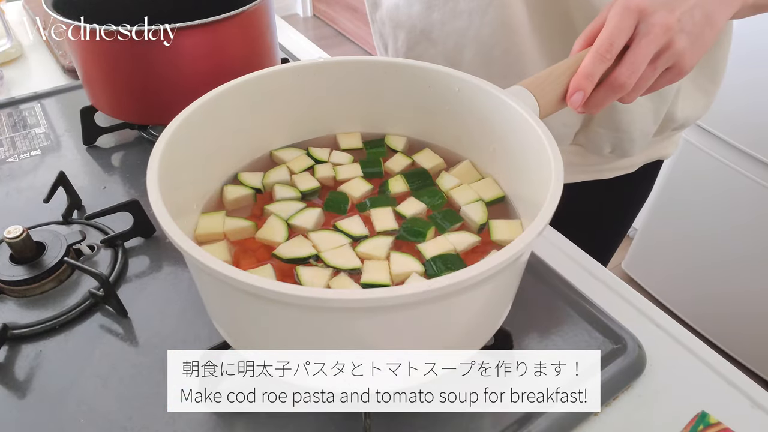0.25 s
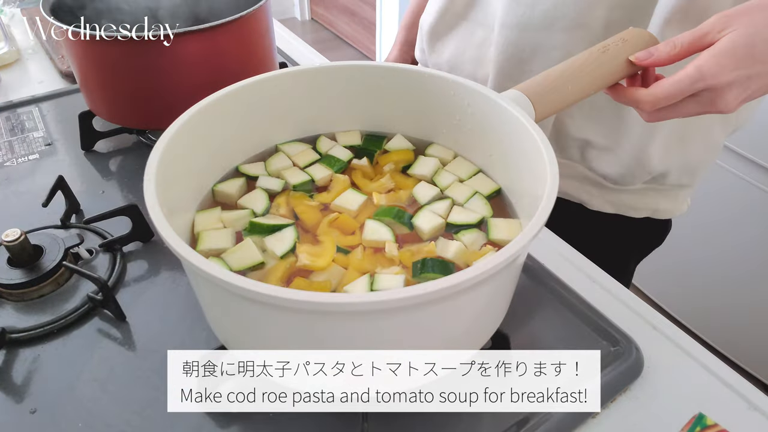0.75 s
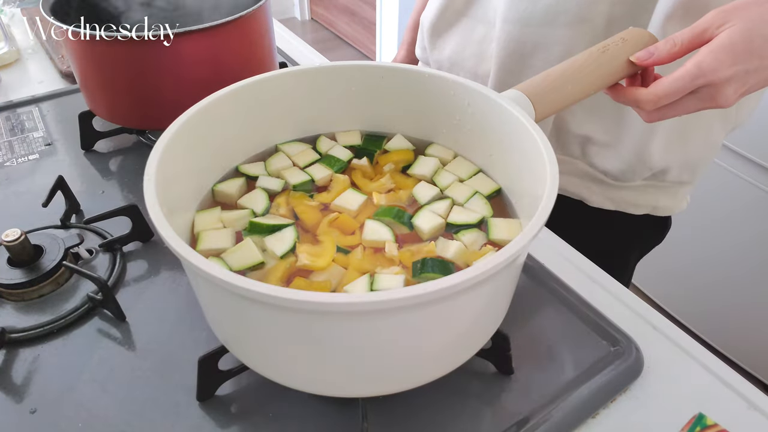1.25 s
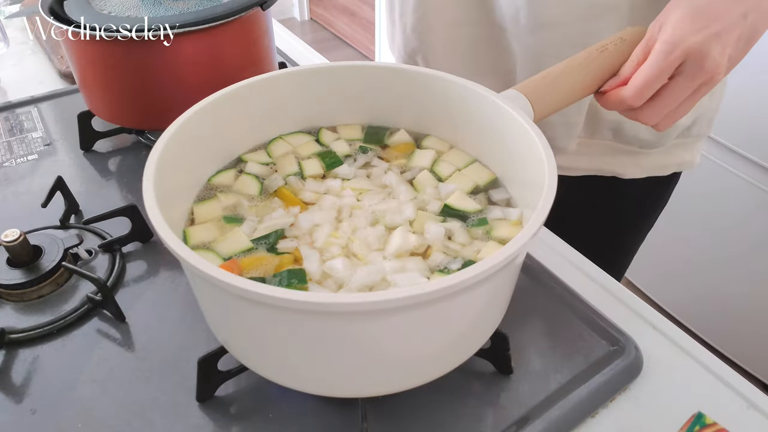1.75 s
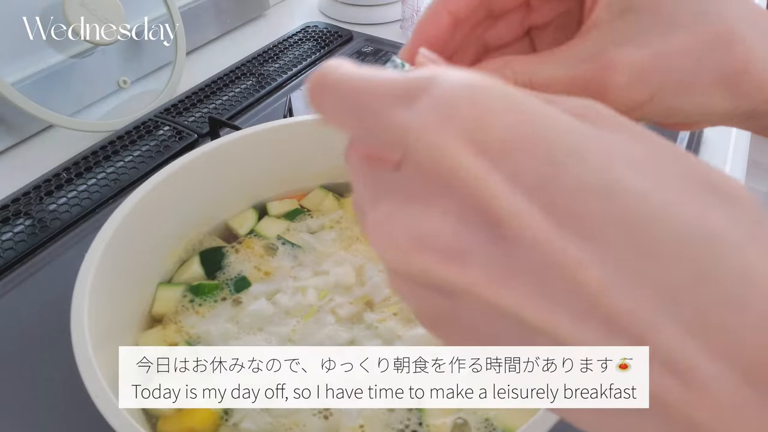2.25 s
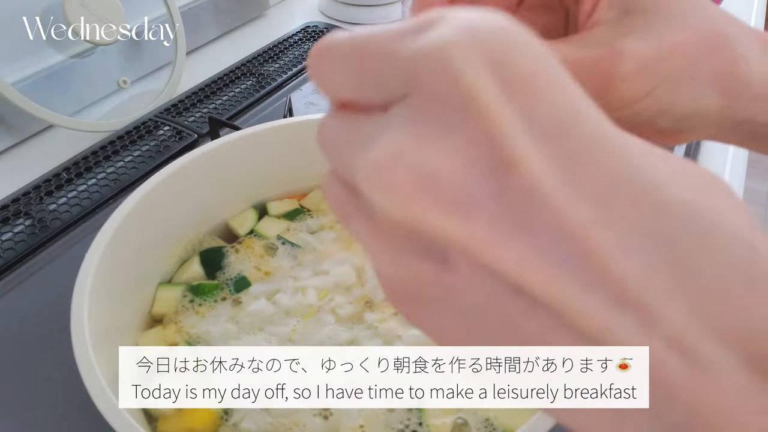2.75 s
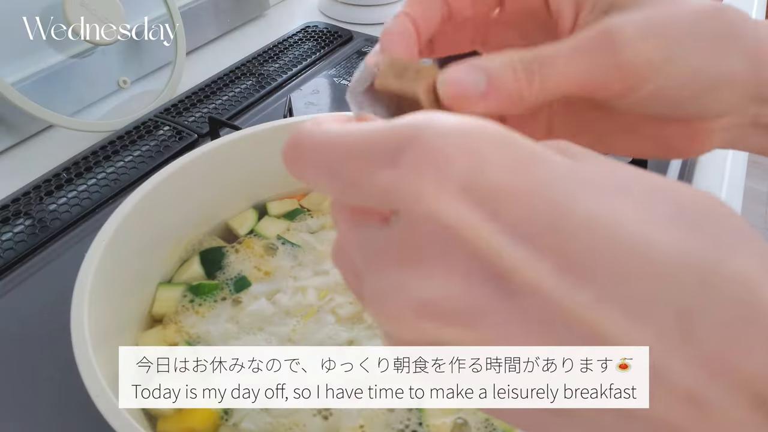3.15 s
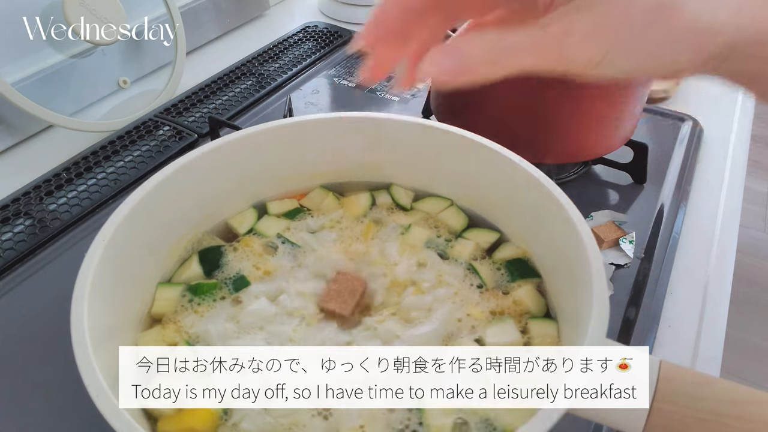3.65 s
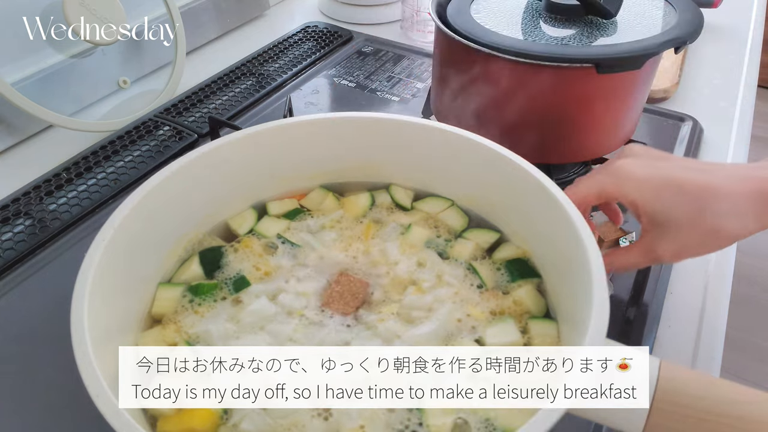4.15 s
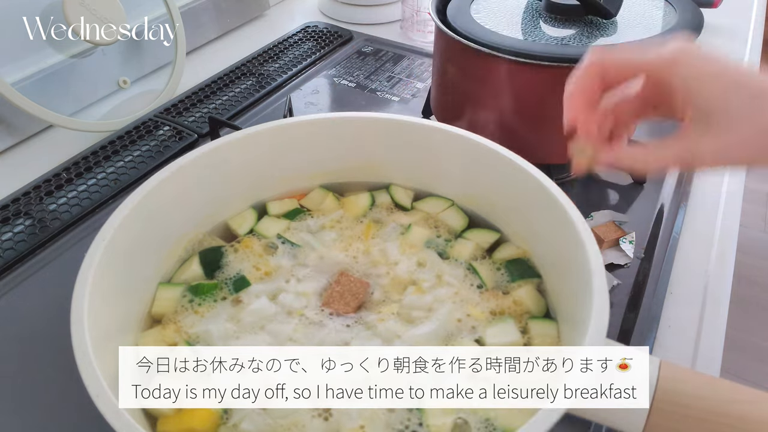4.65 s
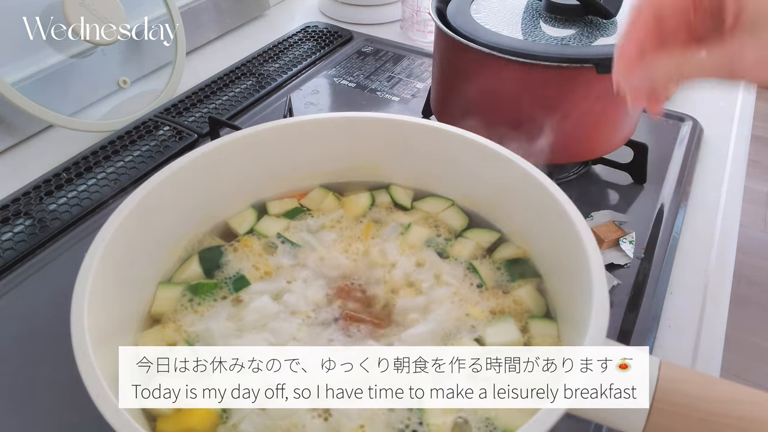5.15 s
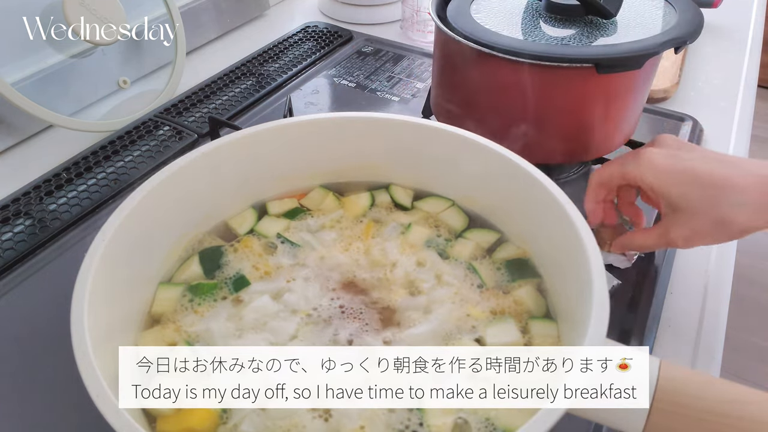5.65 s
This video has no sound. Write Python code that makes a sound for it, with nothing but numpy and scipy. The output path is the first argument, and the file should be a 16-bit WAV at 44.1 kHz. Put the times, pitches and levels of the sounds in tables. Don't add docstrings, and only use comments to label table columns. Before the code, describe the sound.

A quiet stove under a rumbling fan gives way to crisp foil peeling, a sharp rip, two small soup plops and rummaging crinkles.

```python
import sys
import numpy as np
from scipy import signal
from scipy.fft import rfft, irfft, next_fast_len
from scipy.io import wavfile
from scipy.ndimage import uniform_filter1d, map_coordinates

SR = 44100
rng = np.random.default_rng(int(sys.argv[2]) if len(sys.argv) > 2 else 0)


def ratio(d):
    e = np.asarray(d, float) / 20
    return 10 ** e


def master(y):
    cut = np.clip(np.atleast_2d(y).T, -1, 1)
    pcm = np.round(cut * 32767)
    wavfile.write(sys.argv[1], SR, pcm.astype(np.int16))


N = 259749
CLOSE_SHOT_S = 2.187


def unit(x):
    return x / np.sqrt(np.mean(x ** 2) + 1e-20)


def along(points, hz):
    f, value = np.transpose(points)
    return np.interp(np.log(hz + 1), np.log(f + 1), value)


def filtered(x, response):
    size = next_fast_len(x.shape[-1] + 8192)
    spectrum = rfft(x, size) * response(np.fft.rfftfreq(size, 1 / SR))
    return irfft(spectrum, size)[..., :x.shape[-1]]


def wobble(rate):
    knots = rng.standard_normal(int(N * rate / SR) + 4)
    return map_coordinates(knots, [np.arange(N) * rate / SR])


def panned(pan_db):
    half_db = np.atleast_1d(pan_db) / 2
    return ratio(np.array([half_db, -half_db]))


def ports(count, share=0.27):
    left, own = rng.standard_normal((2, count))
    return np.array([left, share * left + np.sqrt(1 - share ** 2) * own])


def swells(rows):
    s, db, rise_s, fall_s = np.transpose(rows)[:4, :, None].astype(np.float32)
    late = (np.arange(0, N, 8) / SR).astype(np.float32) - s
    drop_db = 20 * np.where(late < 0, -late / np.abs(rise_s), late / np.abs(fall_s))
    gains = ratio(np.maximum(db - drop_db, -140))
    return np.repeat(gains, 8, axis=1)[:, :N]


def summed(gains):
    return np.sqrt(np.sum(gains ** 2, axis=0))


def hollow(rows, width_hz):
    gains = swells(rows)
    hz = np.array(rows)[gains.argmax(axis=0), -1]
    swing = filtered(rng.standard_normal((2, 2, N)), lambda f: 1 / (1 + (f / width_hz) ** 2))
    phase = 2 * np.pi * np.cumsum(hz) / SR
    return summed(gains) * unit(swing[0] * np.sin(phase) + swing[1] * np.cos(phase))


def patchy(x, patch_db, size, smooth):
    z = signal.stft(x, nperseg=size)[2]
    spots = uniform_filter1d(rng.standard_normal(z.shape[1:]), smooth[0], axis=0)
    spots = uniform_filter1d(spots, smooth[1], axis=1)
    gain_db = patch_db * unit(spots) - patch_db ** 2 * np.log(10) / 20
    return signal.istft(z * ratio(gain_db), nperseg=size)[1][:, :N]


# from t/s, to t/s
HOLDS = [
    (2.17, 2.72),
    (2.72, 3.03),
    (3.03, 3.46),
    (3.46, 4.2),
    (4.2, 4.7),
    (5.05, 5.48),
    (5.48, 5.89),
]


def grip(s):
    return np.maximum(np.searchsorted(np.transpose(HOLDS)[0], s) - 1, 0)


LEADS = [3, -9, 8, 3, -6, 0, -4]
# f/Hz, level/dB per Hz
FOIL_COLOURS = [
    [(1470, -14), (2500, -4), (3150, -11), (4060, -5), (6160, -2.5), (7420, -6), (9070, -2), (15800, -6)],
    [(710, -17), (1200, -9.5), (1540, -8.5), (2670, -4.5), (5040, -9.5), (5990, -5.5), (7270, 1),
     (13900, -1.5), (15800, -9)],
    [(530, -22), (900, -9.5), (1320, -11), (1830, -11.5), (3530, -7), (5310, -12.5), (8570, -7.5),
     (9550, -14.5), (14500, -7), (15800, -7.5)],
    [(1410, -16), (2400, -7), (2600, -2), (3110, -9.5), (3670, -5), (7130, -15), (9610, -13.5),
     (10700, -16.5), (14600, -17), (15800, -18)],
    [(1410, -20), (2400, -5.5), (2880, -6.5), (3590, -3), (4340, -4.5), (4690, 1), (6640, -10), (12500, -7),
     (15800, -15)],
    [(710, -29), (1200, 1), (1400, -7), (6740, -8), (8640, -1.5), (15800, -13)],
    [(880, -21), (1500, -13), (1700, -7), (1960, -9.5), (2100, -5), (3430, -4.5), (4100, -1.5),
     (5560, -7.5), (9850, -1), (15800, -7.5)],
]


def sheet(dull, bright):
    split_hz = 6500
    out = np.zeros((2, N))
    for (start, end), colour, lead in zip(HOLDS, FOIL_COLOURS, LEADS):
        span = slice(round(start * SR), round(end * SR))
        low = filtered(dull[:, span], lambda hz: unit(ratio(along(colour, hz)) * (hz < split_hz)))
        high = filtered(bright[:, span], lambda hz: unit(ratio(along(colour, hz)) * (hz >= split_hz)))
        left, right = low + high
        out[:, span] += [left, np.roll(right, lead)]
    return out


def bursts(rows, rise_s, body_db, ring_db, under_db, wander=0.21):
    linger = 3
    dull, bright, ring = np.zeros((3, 2, N + SR))
    for s, db, pan_db, hz, bright_db, t60 in rows:
        t = np.arange(int(linger * t60 * SR)) / SR
        span = slice(round(s * SR), round(s * SR) + len(t))
        gain = ratio(db) * panned(pan_db) * (1 - np.exp(-t / rise_s)) ** 2
        tick = ratio(-60 * t / t60)
        body = ratio(-60 * t / (linger * t60))
        grain = ports(SR // 16)[:, np.arange(len(t)) % (SR // 16)]
        noise = gain * (tick + ratio(body_db) * body) * grain
        thin = signal.lfilter(*signal.butter(2, 0.46 * hz, "high", fs=SR), noise)
        dull[:, span] += thin + ratio(under_db) * (noise - thin)
        bright[:, span] += ratio(bright_db) * noise
        drift = np.cumsum(wander * np.resize(rng.standard_normal(SR // 16), len(t)))
        arrival = t - np.array([[0], [LEADS[grip(s)] / SR]])
        tone = np.sin(2 * np.pi * (hz * arrival + rng.random()) + drift)
        ring[:, span] += gain * ratio(ring_db) * body * tone
    return dull[:, :N], bright[:, :N], ring[:, :N]


def brightened(rows, db, tilt_db):
    return [(s, peak_db, pan_db, hz, db + tilt_db * np.log2(hz / 5000), t60)
            for s, peak_db, pan_db, hz, t60 in rows]


# t/s, peak level/dB, left-right level/dB, ring f/Hz, bright level/dB
PICKS = [(2.1942, -42, 2, 5350, -2), (2.2163, -33, 4, 6080, -3), (2.2526, -34.5, -9, 5420, -2),
         (2.358, -45, 1, 8230, 8), (2.373, -39.5, 5, 8070, -3), (2.415, -49, 3, 8300, 3),
         (2.4411, -44, 1.5, 8100, 1), (2.45, -43.5, 3, 8700, 5), (2.494, -47, -1, 5950, -4),
         (2.5027, -34, 3, 5500, -8), (2.5302, -36, 8, 9200, -1), (2.5442, -35.5, -1.5, 5340, 3),
         (2.5766, -33, -1, 5600, -13), (2.6215, -34, 7, 6400, 0.5), (2.64, -33.5, -1, 3970, -5),
         (2.758, -22, -1, 5920, 1), (2.763, -34, 2, 7500, -4), (2.781, -35, 0, 9000, 0),
         (2.8245, -26.5, 0, 7000, 1), (2.829, -31, 0, 9500, 0), (2.7851, -20, -1.5, 5800, -9),
         (2.819, -21.5, 0, 5840, -4.5), (2.8365, -24.5, -2, 8200, 2), (2.877, -21, -3.5, 2660, -7.5),
         (2.874, -34, 0, 6400, -2), (2.856, -33, 0, 7000, -3), (2.935, -33, 5.5, 8460, -3)]
PULLS = [(3.0848, -36.5, 5, 3680, -5), (3.091, -35, 1.5, 5300, -8), (3.1053, -31, .4, 5350, -6),
         (3.1212, -26.5, 0, 5430, -3), (3.128, -25.5, 1, 4360, -8), (3.164, -22, 1, 4050, -8),
         (3.176, -28, .4, 5800, -1), (3.197, -21, 0, 4750, -2), (3.142, -21, -0.5, 4380, 3),
         (3.221, -15.5, 0, 5610, -17), (3.2485, -13, -0.5, 4140, -7), (3.257, -21.5, 5, 6170, -6),
         (3.2654, -26, -6.5, 7500, -11), (3.2706, -17.5, 2, 3540, -9), (3.2767, -14.5, 5, 7700, -1),
         (3.282, -11.5, 8.5, 4850, -7.5), (3.288, -12, -1, 2895, -6), (3.2927, -24.5, -3, 8770, -14.5),
         (3.302, -17, 4, 8700, -14)]
GROPES = [(4.0143, -47.5, 7, 6260, 0), (4.2604, -47.5, 0, 9300, 3), (4.2752, -45, -4, 6500, 3),
          (4.287, -42, 0, 8000, 0), (4.2923, -37, -1, 6200, -0.5), (4.301, -29, -6, 5580, -13),
          (4.3221, -41, -.4, 5260, -5), (4.331, -37, -1, 5960, -6), (4.4275, -36, -3, 4860, -9),
          (4.449, -35, -1, 5200, -12), (4.3642, -32.5, 2, 5490, -6), (4.4, -38, -2, 4530, -3),
          (4.432, -27.5, 0, 4700, -11), (4.473, -33, -1, 4870, -30), (4.4958, -39, -5, 4700, -30),
          (5.5444, -48, 0, 6020, -6), (5.5588, -33.5, -1, 8680, -7), (5.629, -39, 3, 2410, -3),
          (5.659, -42, .4, 2580, 0), (5.7146, -25.5, -8, 4280, -12), (5.728, -37, 0, 4000, -5),
          (5.801, -29, -7, 4800, -3), (5.807, -26.5, 0, 4900, -3), (5.8479, -19, 2, 4030, -4),
          (5.652, -38, 5, 8800, -6), (5.7116, -17.5, 1, 4120, -10.5), (5.765, -32, -4, 3870, -18),
          (5.79, -25, -3, 4520, -12), (5.8447, -14, 1, 4140, -4.5), (5.8844, -22.5, 0, 6600, -12)]
# t/s, peak level/dB, left-right level/dB, f/Hz, t60/s
TEAR = [
    (3.2795, -10, 3, 9100, 0.0047),
    (3.2989, 1, 12.5, 8700, 0.004),
    (3.2992, -11, 15, 14300, .003),
    (3.2995, -15, 3, 1160, .005),
    (3.3015, -16.5, 4, 3800, 0.0134),
    (3.285, -22.5, -1.5, 520, 0.041),
]
# t/s, peak level/dB, left-right level/dB
SPIKES = [(2.3588, -36, 2), (2.4517, -33, 0), (2.506, -39, 3), (2.5458, -27, 2), (2.5765, -29, 8),
          (2.759, -13, 6), (2.7865, -21, -1), (2.8374, -22, -4), (3.1462, -17.5, 0), (3.1785, -20, 0),
          (3.1935, -22, 0), (3.2113, -18, 5), (3.2233, -14, 2), (3.2583, -13, 2), (3.2792, 0.5, 5),
          (3.2885, -11, 0), (3.2993, -6.5, 12), (3.1872, -21, 0), (3.1985, -21, 0), (2.8198, -21, 0),
          (2.8245, -21, 0), (2.879, -24, 0), (5.6585, -33, 0), (5.8095, -26, 0), (4.4328, -35, 0),
          (4.2612, -42, 4), (4.303, -27, -6), (4.3669, -30, -1), (5.7145, -24, -3), (5.768, -31, -9),
          (5.8459, -14, 7.5), (5.8476, -17, 4)]


def snaps():
    crease_t60 = 0.014
    creases = [row + (crease_t60,) for row in PICKS + PULLS + GROPES]
    tear = brightened(TEAR, db=-3.5, tilt_db=5)
    dull, bright, ring = bursts(creases + tear, rise_s=0.00072, body_db=-19, ring_db=-10.5, under_db=-6.5)
    spike_hz, spike_t60 = 7000, 0.0034
    sharp = [row + (spike_hz, 0, spike_t60) for row in SPIKES]
    spikes = bursts(sharp, rise_s=0.0001, body_db=-24, ring_db=-30, under_db=-12.5)[0]
    return ratio(-5.5) * sheet(dull, ratio(7.0) * bright) + ring + ratio(-5.5) * spikes


def crackle(count, spread_db, life_s):
    at, size = rng.random((count, 2)).T
    strength = ratio(-2 * spread_db * np.log(1 - size * 0.99))
    blows = np.bincount((at * N).astype(int), strength, N)
    power = signal.lfilter([1], [1, -np.exp(-1 / (life_s * SR))], blows)
    power = power / uniform_filter1d(power, size=4000)
    return np.sqrt(np.abs(power)) * ports(N)


# t/s, crumple level/dB, rise/s and fall/s per 20 dB, crackle over crumple level/dB
PEELING = [(2.189, -52.5, 0.0065, 0.08, -4), (2.268, -50, 0.042, 0.02, 6), (2.368, -58, 0.1, 0.1, 4.5),
           (2.451, -76, 0.34, -0.8, 0), (2.56, -48, 0.031, 0.12, 2.5), (2.643, -42, 0.14, -0.01, -1.5),
           (2.67, -63, .02, -3.5, -5), (2.765, -47, 0.037, 0.08, 7), (2.828, -40.5, 0.09, 0.05, -12),
           (2.885, -39, 0.027, 0.07, -2.5), (2.954, -46, 0.25, 0.01, -5), (2.745, -63, .02, 1.9, -5.5),
           (3.09, -57.5, 0.02, 0.6, -6.5), (3.125, -42, 0.012, 0.3, -1), (3.181, -32.5, 0.085, 0.15, 1.5),
           (3.284, -25.5, .1, 0.025, -2), (3.306, -29.5, .006, 0.0385, -3), (3.345, -46, .1, -0.05, -3)]
RUMMAGING = [(3.5, -60.5, .4, .3, -16), (3.608, -47.5, 0.079, 0.29, -4.5), (3.659, -38.5, .02, 0.013, -6),
             (3.83, -50.5, 0.2, 0.12, 0), (4.025, -60.5, 0.028, 0.18, -3), (4.326, -44, 0.054, 0.051, -1.5),
             (4.374, -47, 0.039, 0.09, 1), (4.47, -50.5, 0.153, 0.12, -9),
             (5.077, -49.5, 0.0081, 0.059, -1), (5.14, -65.5, 0.094, 0.216, -3), (5.4, -73, 0.45, 0.37, 1),
             (5.56, -51, 0.021, 0.14, -1), (5.657, -44, 0.043, 0.091, -4), (5.72, -43.5, 0.036, 0.071, -1),
             (5.805, -38.5, 0.039, 0.24, 0), (5.885, -38.5, 0.15, .1, -16.5)]
HAND_PANS = [-.5, -1, -0.5, 3, 0.5, -2, -0.5]


def rustle():
    squeezes = np.array(PEELING + RUMMAGING)
    crumple = swells(squeezes)
    crackling = crumple * ratio(squeezes[:, -1:])
    pan_db = np.array(HAND_PANS)[grip(np.arange(N) / SR)]
    grains = crackle(count=7000, spread_db=2.6, life_s=0.0037)
    grains = patchy(grains, patch_db=3.0, size=256, smooth=(3, 8)) * panned(pan_db)
    return sheet(ratio(-2.0) * summed(crumple) * grains, ratio(0.5) * summed(crackling) * grains)


# t/s, level/dB, rise/s and fall/s per 20 dB, f/Hz
POCKET_BREATH = [
    (3.146, -34, 0.00597, .015, 1025),
    (3.23, -42, .06, .1, 1345),
    (3.29, -42, .1, .02, 1475),
    (4.38, -59.5, .05, .07, 1690),
    (4.48, -63.5, .2, .05, 1728),
    (5.855, -49.5, .01, .03, 1694),
]
# t/s, peak level/dB, left-right level/dB, f/Hz, t60/s
PLUCKS = [
    (3.2085, -27, 2, 1337, 0.011),
    (3.2225, -22, -2, 1337, 0.017),
    (3.2485, -19, 3, 1380, 0.0069),
    (3.2585, -22.5, 2, 1330, 0.015),
    (3.271, -22, -1, 1225, .006),
    (3.281, -24, -1, 1455, 0.014),
    (3.292, -17, -0.5, 1490, 0.0072),
    (3.2995, -19.5, 0, 1047, 0.0064),
    (5.846, -30, 1, 1703, .012),
]


def pocket():
    struck = brightened(PLUCKS, db=0, tilt_db=0)
    notes = bursts(struck, rise_s=0.0014, body_db=-20, ring_db=1, under_db=0, wander=0.036)[2]
    return hollow(POCKET_BREATH, width_hz=73) + notes


# t/s, peak level/dB, left-right level/dB, f/Hz, t60/s
CUBE_HITS = [(1.3115, -45, -7, 3020, 0.0051), (3.1435, -20.5, 0, 1034, 0.0056),
             (3.652, -39, -1, 4080, 0.0074), (3.6573, -28.5, 0, 2640, 0.0075), (3.659, -27, 7, 890, 0.0044),
             (5.0693, -45.5, -5, 4900, 0.032), (5.0736, -33, .1, 8500, 0.026),
             (5.0766, -23.5, 1.5, 956, 0.0046), (5.073, -36, -3, 420, 0.0077), (5.076, -36, -1, 260, 0.014),
             (3.658, -38, 0, 420, .008)]


def drops():
    splash = [(150, -18.0), (400, -4.0), (2500, 2.0), (6000, -5.5), (7000, -44.5)]  # f/Hz, level/dB
    spray = [(5000, -41), (6500, 0.0), (11000, 3.5), (15500, 0.0)]  # f/Hz, level/dB
    hits = brightened(CUBE_HITS, db=-3.5, tilt_db=3.5)
    dull, bright, ring = bursts(hits, rise_s=0.0003, body_db=-13, ring_db=-3, under_db=0, wander=0.1)
    close = np.arange(N) > CLOSE_SHOT_S * SR
    splashing = filtered(dull, lambda hz: ratio(along(splash, hz)))
    spraying = filtered(bright, lambda hz: ratio(along(spray, hz))) * close
    cavity = filtered(ring, lambda hz: 1 / (1 + (hz / 2600) ** 4))
    return ratio(1.0) * (splashing + spraying) + cavity


# start t/s, rumble level/dB, air level/dB, simmer level/dB, gas hiss level/dB
SHOTS = [
    (0, -46, -62.5, -74.5, -65),
    (.458, -47.5, -61, -69.5, -65),
    (1.315, -48, -63, -76.5, -67),
    (2.187, -46.5, -60, -81, -66),
]


def shot(index, grows=1):
    start_gain, wait_s, fade_s = 0.31, 0.37, 1.27
    t = np.arange(N) / SR
    progress = np.clip((t - wait_s) / fade_s, 0, 1)
    fade_db = 20 * np.log10(start_gain + (1 - start_gain) * progress)
    rows = np.array(SHOTS)
    current = np.maximum(np.searchsorted(rows[:, 0], t) - 1, 0)
    return rows[current, index] + grows * fade_db


# f/Hz, wander f/Hz
WHISTLE = (2234, 13)
# t/s, depth level/dB, half
# length/s
FLAME_LIFTS = [(2.227, 14, 0.019), (2.3, -4, .03), (2.33, 16, 0.01), (2.5, -4, .03), (2.408, 12, 0.012),
               (2.461, 12, 0.0058), (2.55, 9, 0.014), (2.605, 5, 0.011), (2.648, 4, .006),
               (2.722, 12, .008), (3.037, 12, .02), (3.492, 10, 0.016), (3.887, 10, .02),
               (3.97, 14.5, 0.019), (4.1, 9, .014), (4.172, 13.5, 0.017), (4.21, 10, .006),
               (4.26, 8, 0.013), (4.582, 17, 0.033), (4.645, 7, 0.016), (4.718, 9, .008), (4.772, 11, .012),
               (4.83, 14, 0.028), (4.978, 11, .012), (5.025, 14, 0.025), (5.183, 14, 0.037),
               (5.26, -5.5, .03), (5.297, 12, .008), (5.34, 10, .015), (5.418, 12, 0.014),
               (5.387, 6, 0.023), (5.48, 7, 0.049), (4.05, -2, .035)]


def whistle():
    t = np.arange(N) / SR
    hz, wander_hz = WHISTLE
    tone = np.sqrt(2) * np.sin(2 * np.pi * np.cumsum(hz + wander_hz * wobble(70)) / SR)
    broken_db = sum(depth_db * np.exp(-((t - s) / half_s) ** 2) for s, depth_db, half_s in FLAME_LIFTS)
    wide_db = shot(index=2) - 14.5 - 15 * (t > SHOTS[2][0])
    level_db = np.where(t > CLOSE_SHOT_S, -69.5 - broken_db, wide_db)
    sputter_db = 2.2
    return ratio(level_db + sputter_db * wobble(45)) * tone


# f/Hz, likeness (-1 to 1)
ALIKE = [(25, .55), (42, 0.77), (60, 0.96), (130, 0.98), (290, 0.92), (640, 0.65), (1410, -0.23),
         (3100, 0.039), (6820, -0.06)]


def rush(spectrum):
    def mid_side(hz):
        angle = np.arccos(np.clip(along(ALIKE, hz), -1, 1)) / 2
        return ratio(along(spectrum, hz)) * [np.cos(angle), np.sin(angle)]

    mid, side = filtered(rng.standard_normal((2, N)), mid_side)
    return unit(np.array([mid + side, mid - side]))


# f/Hz, level/dB per Hz
SIMMER = [(2200, -46), (2700, 3.5), (4000, 3), (6000, -2.5), (7600, -7.5), (9000, -38)]
# t/s, level/dB, rise/s and fall/s per 20 dB
BOIL = [
    (1.68, -66.5, 0.27, 0.7),
    (2.3, -73, 0.18, -2),
]
# f/Hz, level/dB per Hz
HISS_CLOSE = [(3240, -48), (5500, -13), (5830, -24), (6150, -7.5), (7670, -6.5), (8650, -2.5), (12300, -8),
              (13700, -6), (15900, -5)]
# f/Hz, level/dB per Hz
HISS_WIDE = [(4000, -28.5), (5500, -6), (7500, -3), (8600, -0.5), (10500, -2), (12300, -5.5), (14500, 1.5),
             (15800, 0.5)]


def burner():
    simmer = np.hypot(ratio(shot(index=3, grows=0.9)), summed(swells(BOIL)))
    close = np.arange(N) > CLOSE_SHOT_S * SR
    hiss = np.where(close, rush(HISS_CLOSE), rush(HISS_WIDE))
    simmering = simmer * ratio(0.59 * wobble(6.2)) * rush(SIMMER)
    return simmering + ratio(shot(index=4) + 0.77 * wobble(9.4)) * hiss


# t/s, level/dB, rise/s and fall/s per 20 dB, f/Hz
SIZZLE = [
    (1.4, -78.5, .15, 0.14, 4000),
    (1.66, -80.5, .15, .6, 4700),
    (1.76, -80, .6, .6, 5120),
    (1.86, -80.5, 0.62, .25, 5300),
    (2.0, -83.5, 0.28, .12, 4560),
]


def sizzle():
    return hollow(SIZZLE, width_hz=80)


# f/Hz, level/dB per Hz
RUMBLE = [(12, -47.5), (20, -28), (32, -17.5), (58, -5), (103, 0.5), (157, -6), (257, -4.5), (298, -11),
          (400, -20.5), (448, -10.5), (495, -14), (573, -11.5), (721, -11), (795, -18), (1000, -31),
          (1300, -47), (2200, -120)]
# f/Hz, level/dB per Hz
AIR_WIDE = [(500, -47), (850, -9), (945, -6.5), (1190, -2), (1290, 0), (1510, -8.5), (1860, -3.5),
            (2440, -5), (3000, -19.5), (3900, -61), (6600, -120)]
# f/Hz, level/dB per Hz
AIR_CLOSE = [(700, -62), (850, 4.5), (1000, -6), (1300, -6), (1700, -15.5), (2000, -13), (2500, -18),
             (2900, -41)]
# t/s, level/dB
SURGE = [(2.2, 0), (3.05, 0.9), (3.28, 4), (3.45, 0.2), (3.6, 1), (4.1, -1), (4.35, 1.5), (4.7, -1),
         (5.15, 0.9), (5.5, -1), (5.89, 4)]


def fan():
    surge_db = np.interp(np.arange(N) / SR, *np.transpose(SURGE), left=0)
    rumble_db = shot(index=1) + surge_db + 0.37 * wobble(6.67)
    air_db = shot(index=2) + 1.1 * surge_db + 0.31 * wobble(5.22)
    close = np.arange(N) > CLOSE_SHOT_S * SR
    air = np.where(close, rush(AIR_CLOSE), rush(AIR_WIDE))
    return ratio(rumble_db) * rush(RUMBLE) * panned(-1.2) + ratio(air_db) * air


# f/Hz, t60/s
KITCHEN = [(500, 0.26), (3000, 0.25), (12000, 0.1)]


def kitchen(x):
    hz, t, z = signal.stft(rng.standard_normal((2, SR // 3)), SR, nperseg=256)
    decay = ratio(-60 * t / along(KITCHEN, hz)[:, None])
    tail = signal.istft(z * decay, SR, nperseg=256)[1]
    return signal.fftconvolve(x, tail / np.linalg.norm(tail[0]), axes=1)[:, :N]


# from t/s, to t/s, depth level/dB, above f/Hz
HUSHES = [
    (2.342, 2.357, 7, 2800),
    (2.482, 2.493, 8, 2800),
    (2.739, 2.756, 9, 2800),
    (3.237, 3.247, 9, 7000),
    (3.642, 3.651, 10, 6000),
    (4.246, 4.259, 7, 2800),
    (5.72, 5.733, 8, 7500),
    (5.828, 5.843, 9, 5000),
]


def starved(x):
    out = x.copy()
    for start, end, depth_db, above_hz in HUSHES:
        span = slice(round(start * SR), round(end * SR))
        treble = filtered(x[:, span], lambda hz: 1 / (1 + (above_hz / (hz + 1)) ** 10))
        dip = signal.windows.tukey(treble.shape[1], 0.3)
        out[:, span] -= (1 - ratio(-depth_db)) * dip * treble
    return out


# f/Hz, level/dB
TREBLE_END = [(15800, 0), (16000, -28), (16600, -38), (16750, -120)]


def end_treble(x):
    return filtered(x, lambda hz: ratio(along(TREBLE_END, hz)))


def scene():
    hits = snaps() + drops()
    foil = rustle() + pocket()
    behind = patchy(fan() + burner() + sizzle(), patch_db=1.97, size=1024, smooth=(2, 8))
    return hits + foil + whistle() + ratio(-7) * kitchen(hits) + behind


def band_limit(x):
    return signal.sosfilt(signal.butter(12, 16850, fs=SR, output="sos"), x)


def record(dry):
    limited = dry / (1 + np.abs(dry / 0.95) ** 4) ** 0.25
    mix = end_treble(starved(limited))
    return band_limit(mix)


dry = scene()
out = record(dry)
master(out)
```